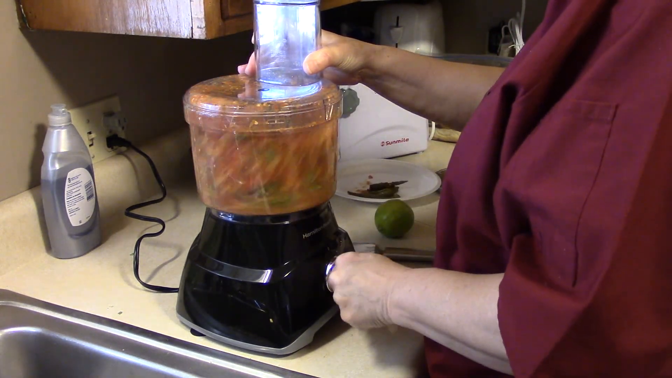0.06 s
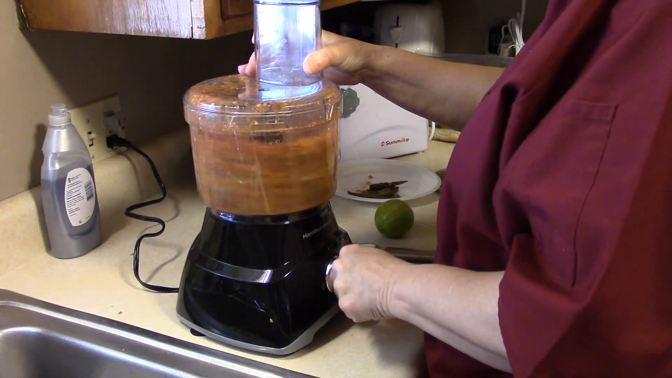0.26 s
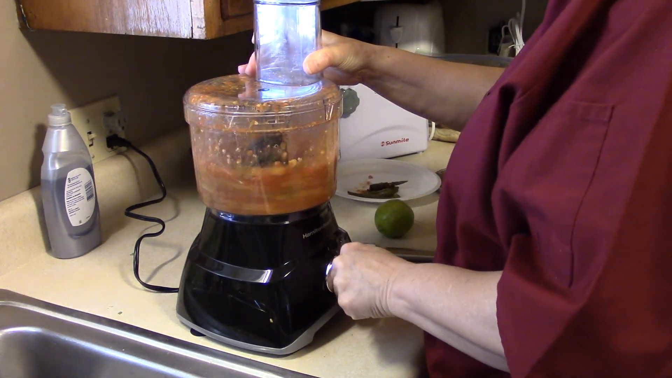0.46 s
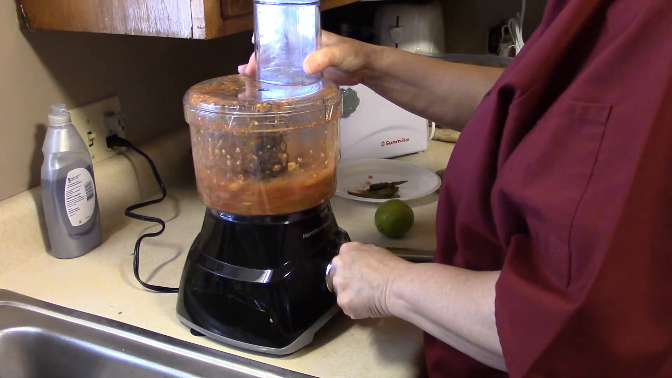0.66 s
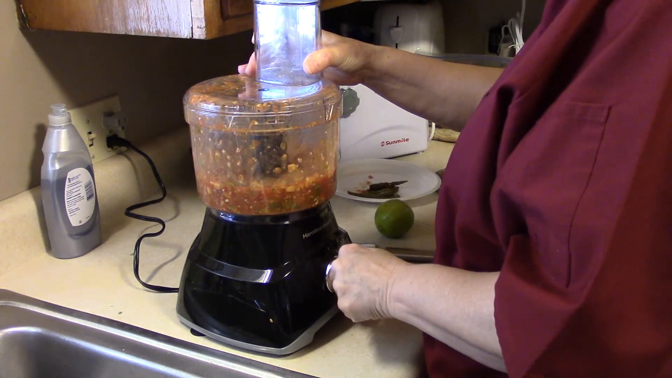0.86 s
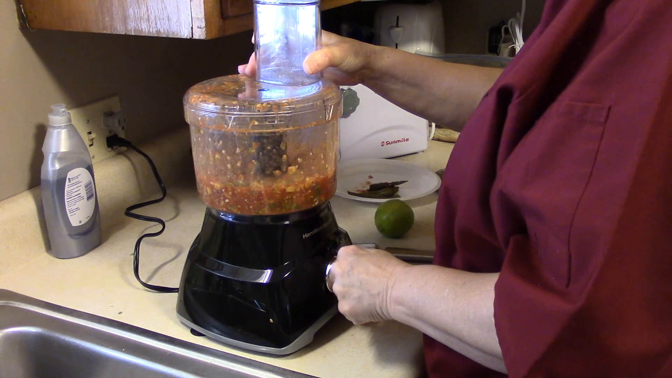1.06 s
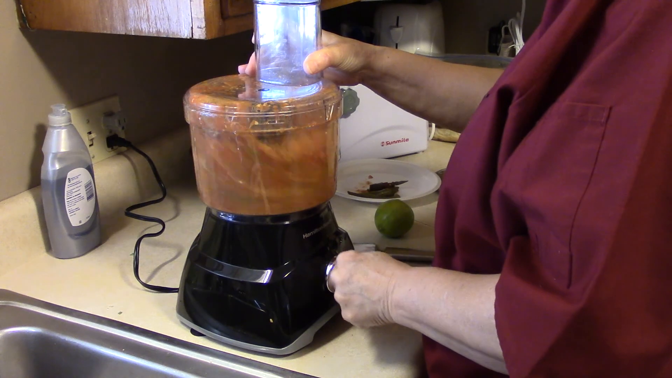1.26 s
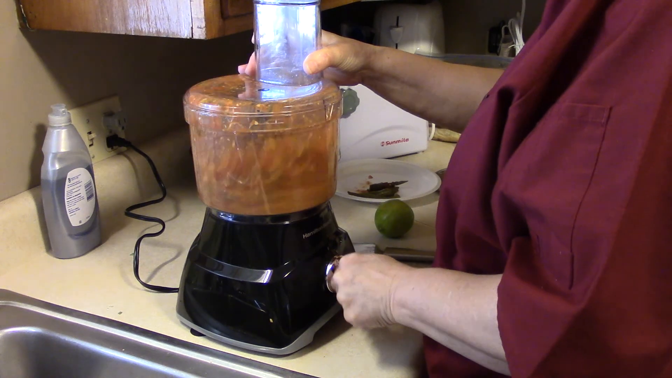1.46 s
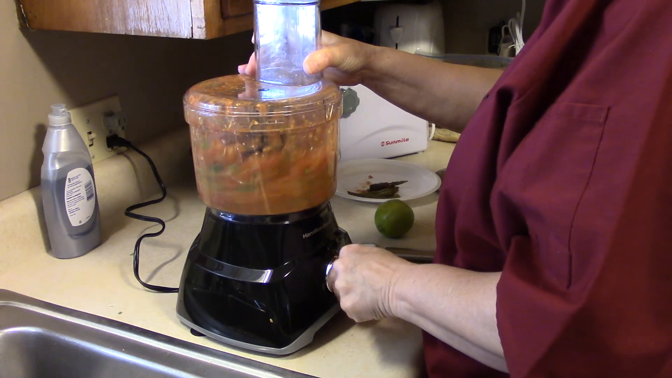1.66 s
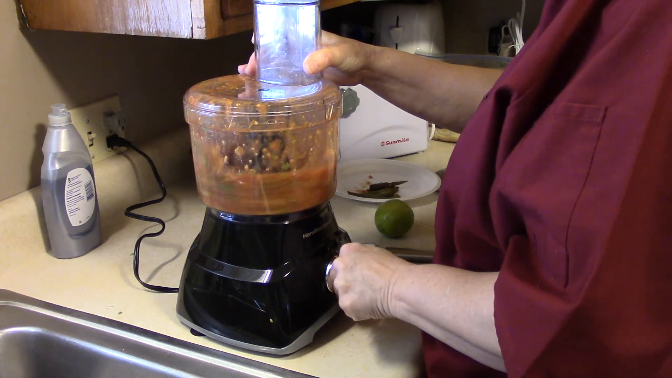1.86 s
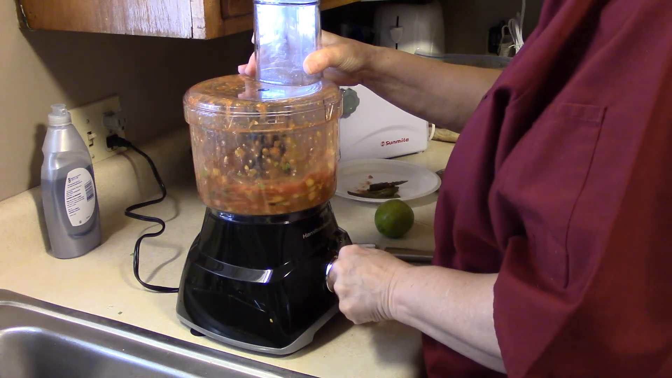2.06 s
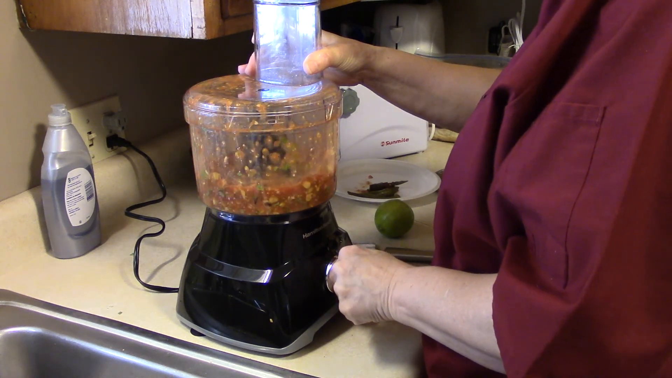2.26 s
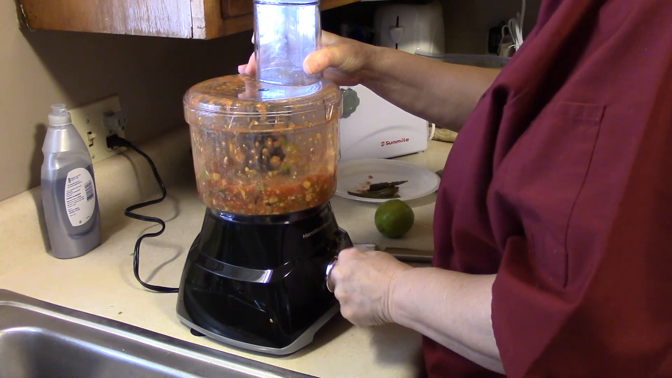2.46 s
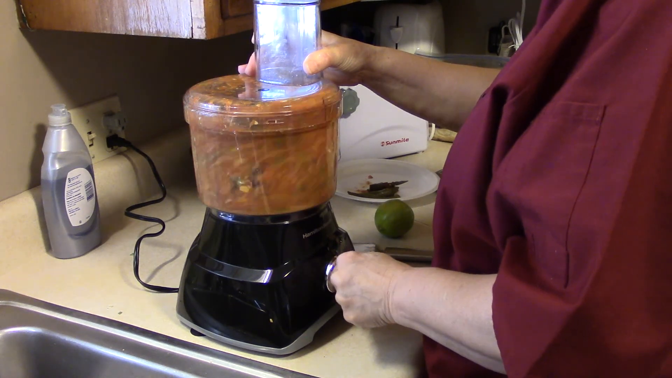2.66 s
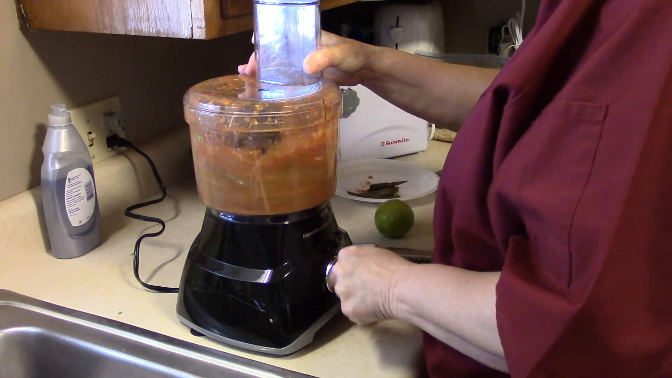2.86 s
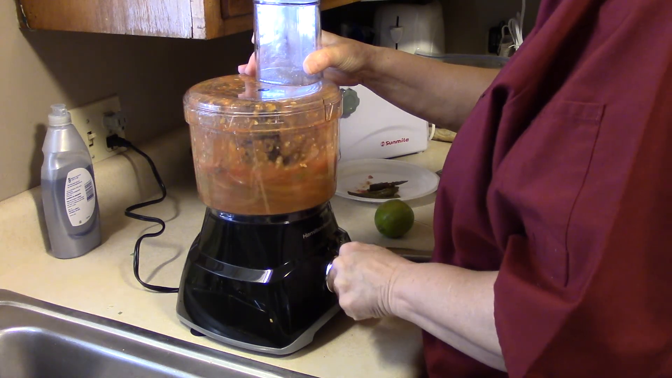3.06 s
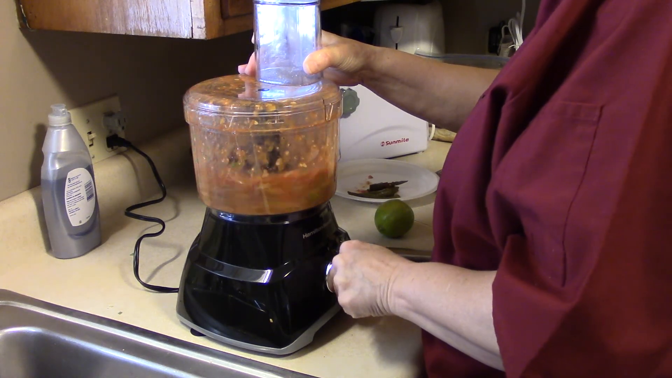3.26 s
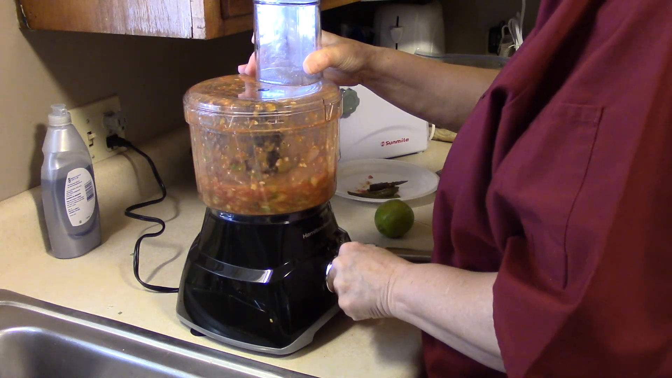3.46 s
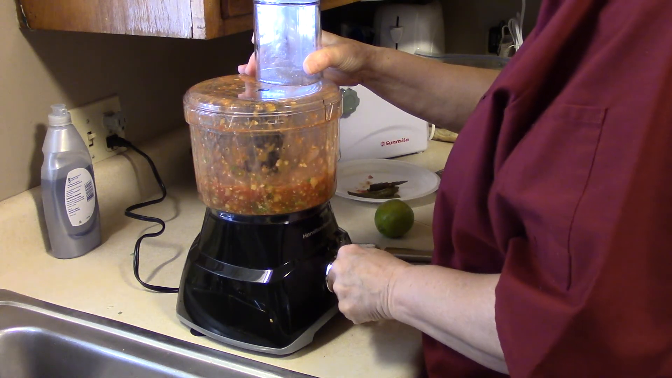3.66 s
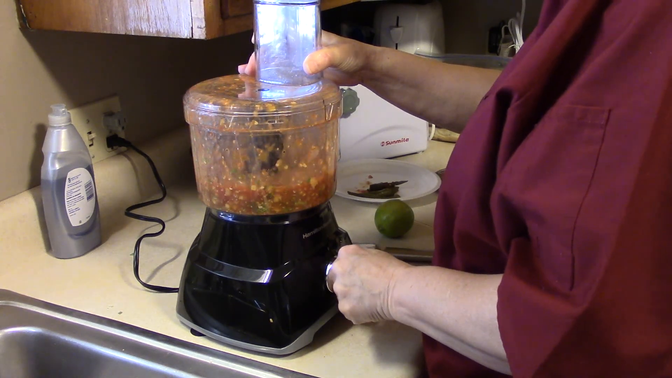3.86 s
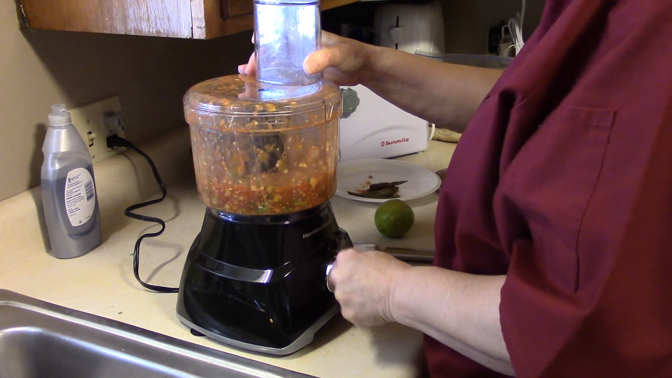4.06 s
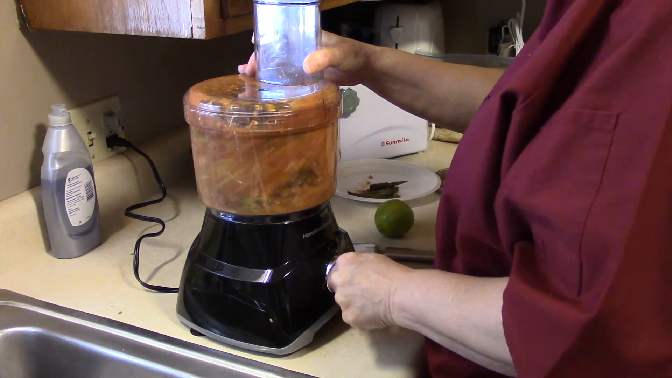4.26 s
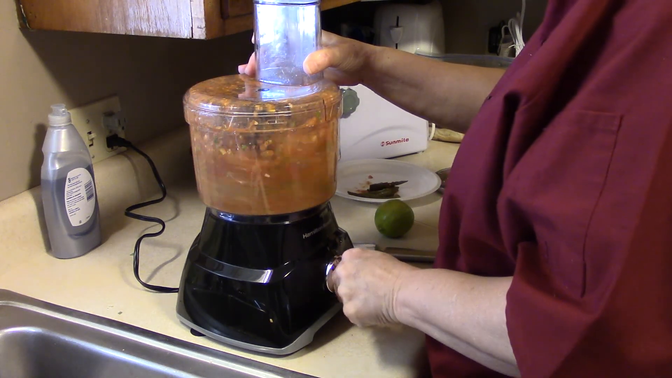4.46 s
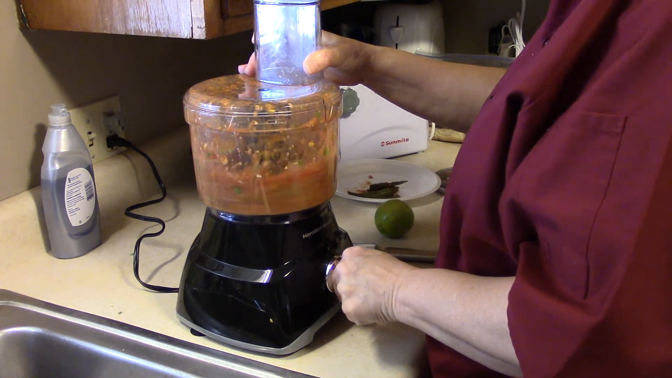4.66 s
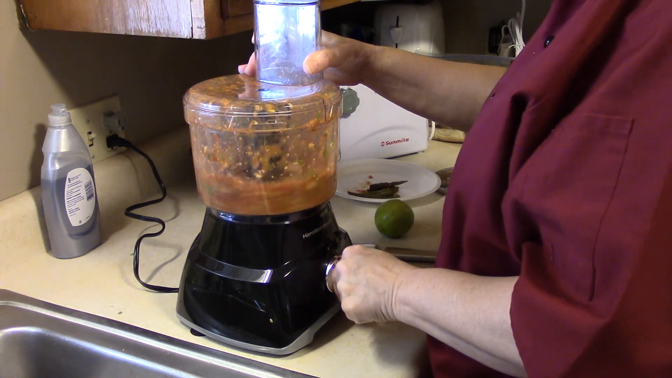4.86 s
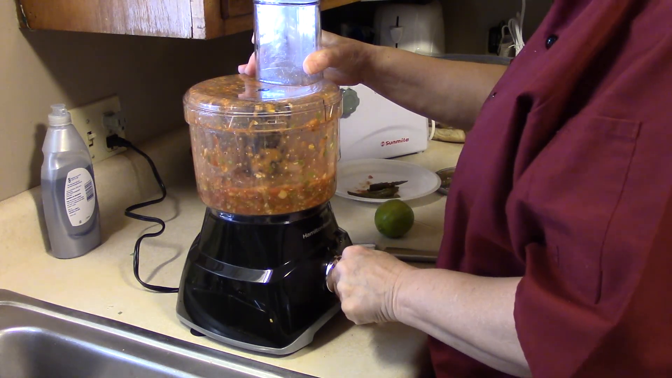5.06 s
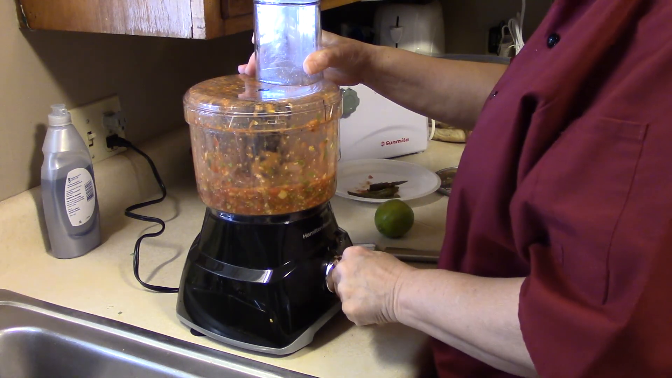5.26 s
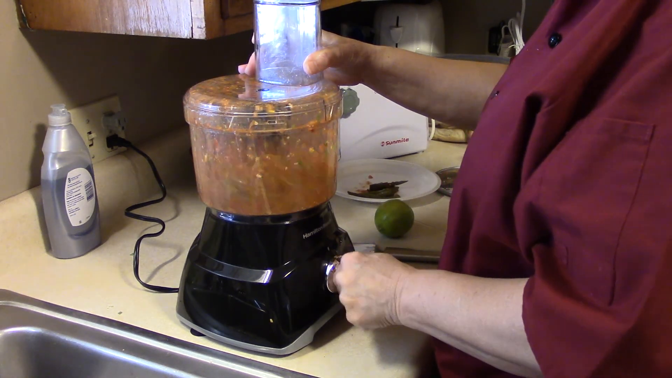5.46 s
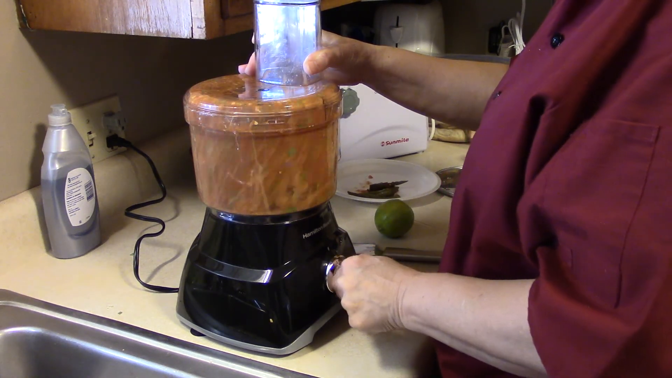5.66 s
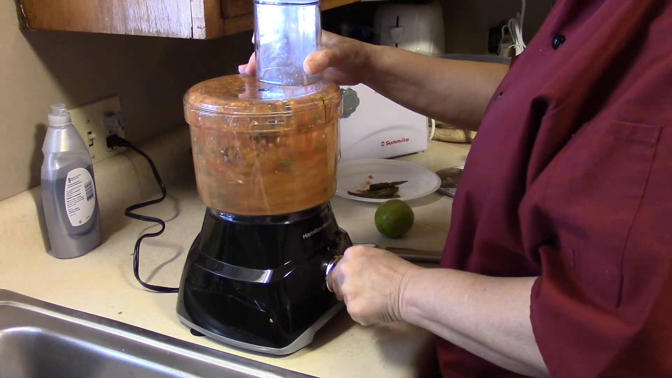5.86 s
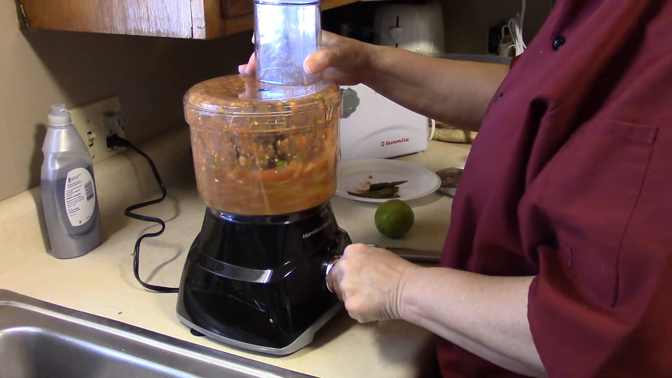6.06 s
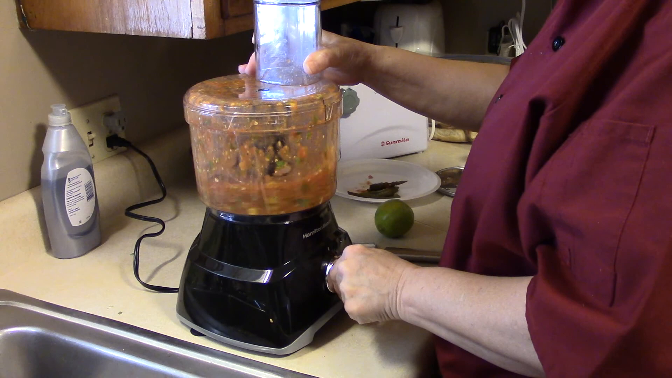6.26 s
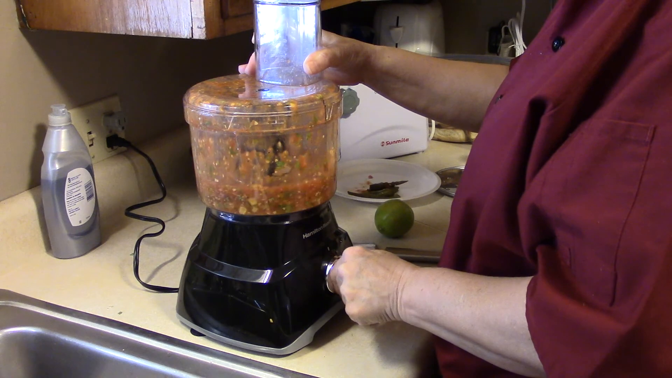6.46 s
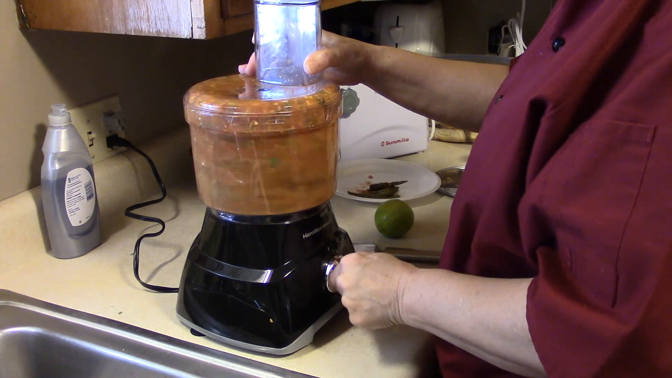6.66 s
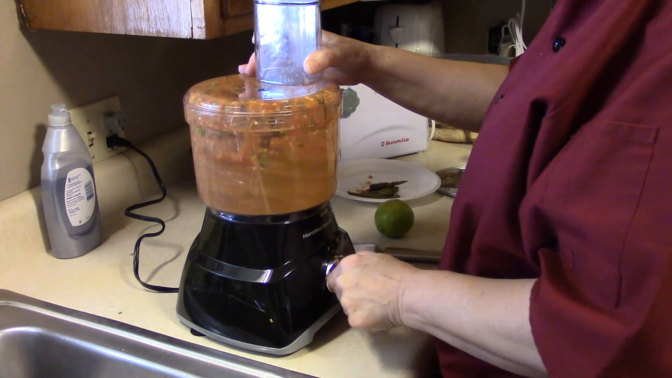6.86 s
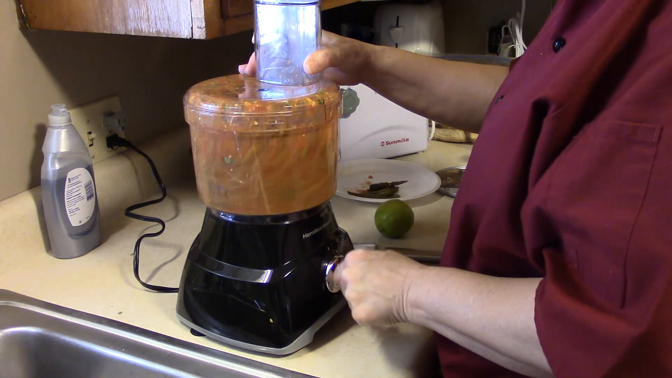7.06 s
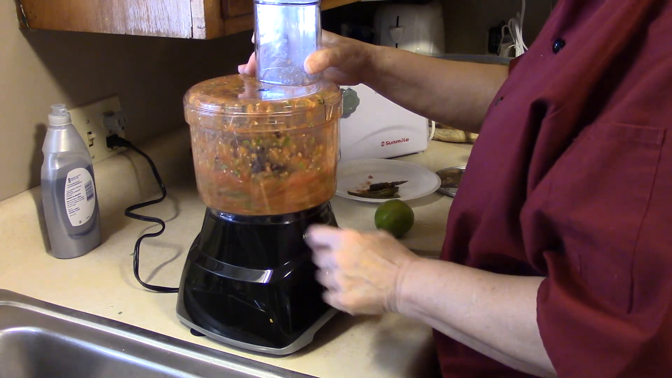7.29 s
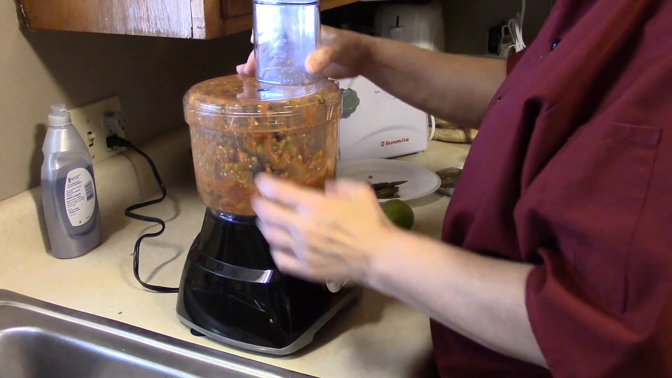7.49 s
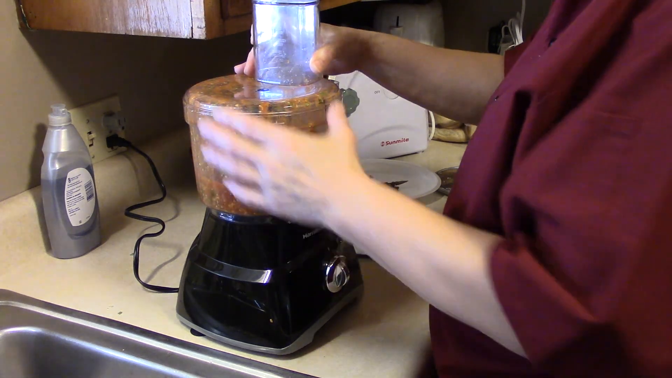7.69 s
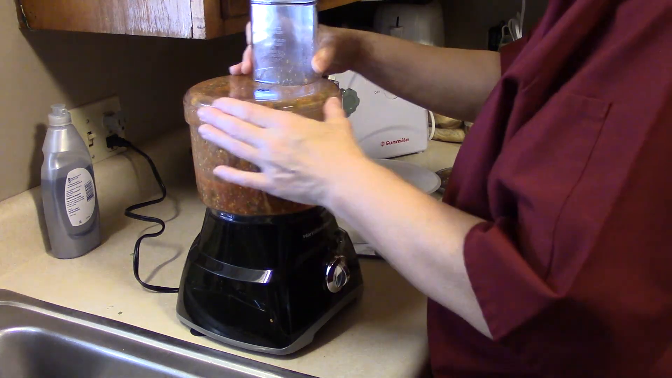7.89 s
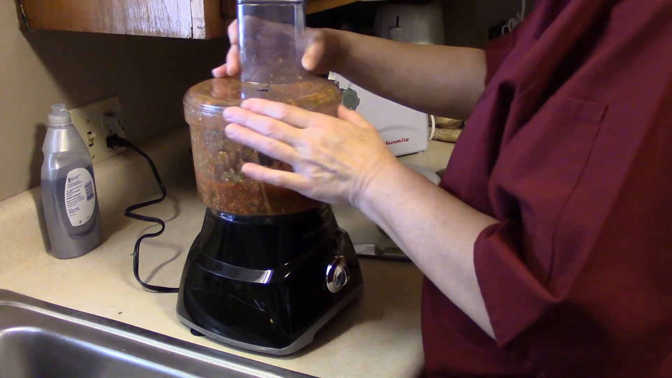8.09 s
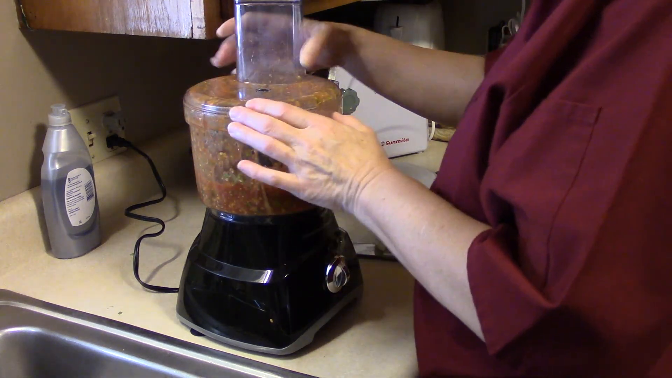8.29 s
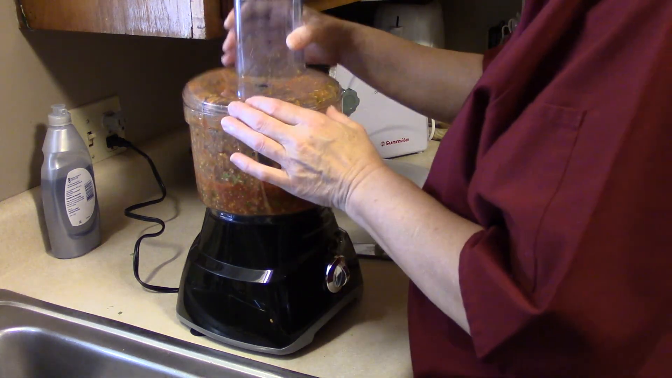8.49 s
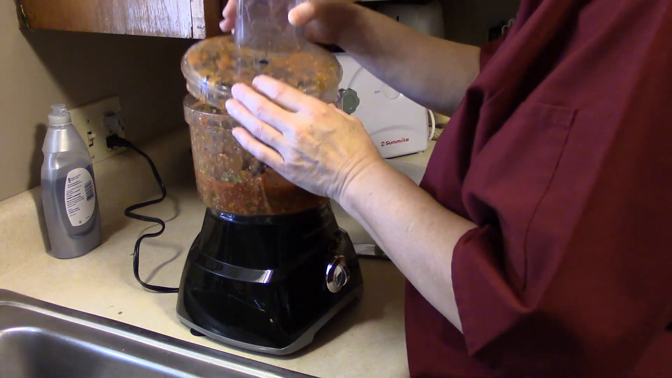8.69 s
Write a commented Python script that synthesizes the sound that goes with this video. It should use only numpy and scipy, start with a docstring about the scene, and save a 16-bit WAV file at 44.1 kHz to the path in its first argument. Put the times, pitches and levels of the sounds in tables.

```python
"""Over a steady appliance hum and a faint intermittent whistle, a food processor of salsa is pulsed six times.
The first pulse is under way at the start: the motor whines, the drive rattles and wet food sprays the bowl.
The blade coasts down and knocks as it stops; each later pulse opens with a switch contact and a jolt of the base.
At the end hands twist the lid loose, and it bumps and slides on the rim. Tones are phase-driven sines;
contacts are noise bursts or random impulses filtered by plastic resonances, and a decaying noise tail is the room."""
import sys
import numpy as np
from scipy import signal
from scipy.fft import rfft, irfft, next_fast_len
from scipy.io import wavfile
from scipy.ndimage import uniform_filter1d, map_coordinates

SR = 44100
rng = np.random.default_rng(int(sys.argv[2]) if len(sys.argv) > 2 else 0)


def dump_mix(stems):
    """Bounce the given channels to the path in sys.argv[1] as a 16-bit WAV at rate SR."""
    frames = np.atleast_2d(stems).T  # one column per channel
    limited = np.clip(frames, -1, 1)  # hard clip at full scale
    pcm = np.round(limited * 32767).astype(np.int16)
    wavfile.write(sys.argv[1], SR, pcm)


N = 384993
T = np.arange(N) / SR  # time, s

# Columns give times, pitches and relative levels; layer gains are applied on top.
# Kitchen noise spectrum: pitch_hz, density_db (per Hz)
QUIET_COLOUR = [(25, -38.5), (42, -40), (58, -21.5), (100, -15), (160, -12.5), (235, -8), (330, -9),
                (480, -11), (700, -16), (1000, -19.5), (1500, -24.5), (2500, -34), (5700, -40.5),
                (11000, -49), (15500, -58)]
# Partials of the appliance hum: pitch_hz, level_db
HUM_PARTIALS = [(119.8, -57), (193.8, -53), (233, -50), (360.7, -55), (387.6, -47), (409.1, -55.5),
                (581.4, -57.5), (1712, -66), (6896, -72), (7020, -77.5)]
# Intervals in which the faint whistle sounds: start_s, end_s
WHISTLE_SPANS = [(.68, .8), (.97, 1.12), (2.05, 2.12), (2.2, 2.33), (3.56, 3.92), (7.77, 7.85)]
# Motor pulses: drive_bites_s, switch_off_s, blade_at_rest_s, level_db, jolt_db, wetness_db
PULSES = [(-.146, .06, .71, -0.2, -2, -1), (1.183, 1.378, 2.033, -1.44, -2, -0.1),
          (2.481, 2.725, 3.44, -1.77, -1.5, 0), (4.073, 4.281, 4.968, -2.2, -1.5, 0.5),
          (5.433, 5.648, 6.36, -1.24, -1.1, 0.04), (6.515, 6.795, 7.57, -2.5, -1.5, 0.9)]
# Resonances of base and bowl: centre_hz, width_hz, lift_db
HOUSING_MODES = [(217.6, 53, -0.5), (314, 36, 5.5), (487, 60, 1.5), (598, 56, 7), (760, 45, 0.5),
                 (916, 92, 2.5), (1089, 78, 2), (1230, 100, 2), (1591, 80, 7), (1753, 91, 2),
                 (2220, 130, 3.5), (2540, 60, -7.5), (2490, 180, 7), (2970, 100, 4), (3530, 51, 1),
                 (6050, 920, 4), (6950, 110, 5.5), (7790, 200, 2.5)]
# Strength of the motor's whine against its pitch: pitch_hz, level_db
WHINE_RESPONSE = [(200, -23), (800, -5), (1600, .5), (2300, 1), (2900, -3), (3600, 0), (4300, -3)]
# Spectrum of the churning load: pitch_hz, density_db (per Hz)
RUMBLE_COLOUR = [(25, -51.5), (70, -23.5), (150, -13), (220, -1), (450, 5), (850, -0.5), (1200, -7),
                 (1800, -10), (3000, -23), (8000, -51)]
# Spectrum of the rattling drive: pitch_hz, density_db (per Hz)
RATTLE_COLOUR = [(40, -55.5), (300, -39.5), (800, -7), (1200, 5.5), (1600, 6), (2600, 4.5), (3300, -6),
                 (4300, -17), (8000, -26), (16000, -55)]
# Spectrum of wet bits hitting the bowl wall: pitch_hz, density_db (per Hz)
SPRAY_COLOUR = [(40, -53.5), (300, -34), (1500, -17.5), (3200, 4), (4600, -2), (7000, -3), (10000, -6.5),
                (13000, -17.5), (16000, -25)]
# Spectrum of the stirred mash's crackle: pitch_hz, density_db (per Hz)
STIR_COLOUR = [(300, -32.5), (1500, -6.5), (3000, 6), (4600, -1.5), (7000, -2), (10000, -7), (13500, -11.5),
               (16000, -16)]
# Spectrum of struck plastic: pitch_hz, density_db (per Hz)
PLASTIC_COLOUR = [(60, -20), (250, 5), (450, 6), (700, 8.5), (1100, 2.5), (2100, -4), (3500, -10.5),
                  (9000, -41.5)]
# Knocks as the blade stops: time_s, level_db
STOP_KNOCKS = [(.662, -22), (2.000, -21), (3.360, -25), (4.915, -26.5), (6.296, -18), (7.555, -22.5)]
# Spectrum of those knocks: pitch_hz, density_db (per Hz)
KNOCK_COLOUR = [(60, -30), (250, 2), (450, 9), (900, 5.5), (1250, -15.5), (2000, -21.5), (3500, -36),
                (9000, -54), (16000, -70.5)]
# Bright part of every contact: pitch_hz, density_db (per Hz)
SNAP_COLOUR = [(40, -53.5), (500, -26), (1500, 7.5), (3000, 5), (5000, 1), (10000, -6), (13000, -17),
               (16000, -24.5)]
# Knob clicks under the fingers: time_s, level_db, bright_share_db
KNOB_CLICKS = [(1.125, -40.5, -2.5), (1.157, -27.5, -18), (2.444, -28.5, -8.5), (4.027, -31, -4.5),
               (4.050, -38, -5.5), (5.326, -28, -12), (6.455, -28, -13), (6.491, -24, -20),
               (7.501, -17.5, -12.5), (7.556, -18, -22)]
# Spectrum of knob and switch contact: pitch_hz, density_db (per Hz)
SWITCH_COLOUR = [(60, -26), (250, -0.5), (600, -1.5), (1200, -0.5), (2500, -4.5), (4000, -13), (9000, -39)]
# Resonances of the lid: centre_hz, width_hz, lift_db
LID_MODES = [(430, 50, 5.5), (610, 50, 8.5), (650, 72, 5.5), (890, 70, 8), (1010, 70, 5.5),
             (1310, 120, 5.5), (1690, 110, 4), (1932, 110, 8), (2265, 67, 0.5), (2710, 90, 3),
             (3380, 80, -0.5), (5230, 200, 2)]
# Spectrum of the starting jolts: pitch_hz, density_db (per Hz)
THUD_COLOUR = [(25, -62), (80, -21.5), (170, 1.5), (400, -1), (620, 6), (1000, -13.5), (2700, -1),
               (4200, -11.5), (9000, -40)]
# Bumps of the lid on the bowl: time_s, level_db, bright_share_db
LID_TAPS = [(7.931, -15, -13), (7.941, -11.5, -2.5), (7.984, -17, -11), (8.195, -9, -24.5),
            (8.303, -25, -33), (8.355, -23, -40), (8.462, -18, -32), (8.476, -21, -21), (8.510, -31, -26),
            (8.544, -30, -7), (8.568, -31.5, 2.5), (8.603, -22.5, -28)]
# Strokes of the lid along the rim: start_s, length_s, rub_db, scrape_db
LID_SLIDES = [(8.175, 0.28, -51, -75), (8.408, 0.17, -38.5, -51)]
# Reverberation of the kitchen: pitch_hz, t60_s
KITCHEN_DECAY = [(150, 0.34), (1000, 0.62), (4000, 0.44), (14000, 0.51)]
# Base response to rotor imbalance: rotor_hz, level_db
MOUNT_RESPONSE = [(40, -64.0), (100, -31.5), (150, -20), (225, -6), (270, -7), (310, 1), (345, 3.5), (385, -11)]
# Nearly flat spectrum exciting the housing with the whine: pitch_hz, density_db (per Hz)
WHINE_COLOUR = [(100, 0.0082), (16000, 0)]
# Spectrum of the lid's scrape: pitch_hz, density_db (per Hz)
SCRAPE_COLOUR = [(2000, -18.0), (5000, 5.0), (10500, -4.5), (16000, -14.0)]
# Spectrum of the left-right difference: pitch_hz, density_db (per Hz)
SIDE_COLOUR = [(250, 0.5), (1000, -1.5), (4000, 3), (8000, 4.0), (14000, -7.5)]

FREE_HZ, SPIN_UP_S = 402, 0.099  # free rotor speed in turns a second, and its time constant
LEAD_S = 0.012  # the power comes on this long before the drive bites


def amp(db):
    """Level law: converts decibels to an amplitude ratio."""
    return 10 ** (np.asarray(db) / 20)


def unit(x):
    """Power normalisation: scales to rms 1."""
    return x / np.sqrt(np.mean(x ** 2) + 1e-20)


def along(points, hz):
    """Logarithmic frequency scale: interpolates (Hz, value) points."""
    f, v = np.transpose(points)
    return np.interp(np.log(hz + 1), np.log(f + 1), v)


def wobble(rate):
    """Band-limited fluctuation: a smooth curve through random knots, rate a second."""
    knots = rng.standard_normal(int(N * rate / SR) + 4)
    return map_coordinates(knots, [T * rate])


def body(colour, modes=(), size=8192):
    """Minimum-phase resonator: a causal response of energy 1 with a broad colour and modal lifts."""
    hz = np.fft.rfftfreq(size, 1 / SR)
    db = along(colour, hz)
    for centre, width, lift in modes:
        db = db + lift / (1 + (2 * (hz - centre) / width) ** 2)
    cepstrum = irfft(np.log(amp(db)))
    # folding the cepstrum onto positive time makes the response causal
    cepstrum[1:size // 2] *= 2
    cepstrum[size // 2 + 1:] = 0
    response = irfft(np.exp(rfft(cepstrum)))
    return response / np.linalg.norm(response)


def through(x, response):
    """Linear superposition: each sample of x rings the impulse response."""
    return signal.oaconvolve(x, response)[:N]


def impacts(rate, spread_db):
    """Random collision train: signed impulses of uneven size, rate a second, scaled to rms 1."""
    chance = rate / SR
    hit = rng.random(N) < chance
    sign = np.sign(rng.standard_normal(N))
    size = amp(spread_db * rng.standard_normal(N))
    return unit(hit * sign * size / np.sqrt(chance))  # keeps the power even as the rate changes


def blows(rows, colour, modes, t60, snap_t60, body_db, snap_db, attack):
    """Contact transient: decaying noise excites the plastic, with a separate bright snap on top."""
    dull, bright = np.zeros((2, N + SR))
    t = np.arange(SR // 3) / SR
    onset = 1 - np.exp(-t / attack)
    for s, db, share_db in rows:
        a, b = rng.standard_normal((2, len(t))) * onset
        span = slice(round(s * SR), round(s * SR) + len(t))
        dull[span] += a * amp(db + body_db - 60 * t / t60)
        bright[span] += b * amp(db + share_db + snap_db - 60 * t / snap_t60)
    return through(dull[:N], body(colour, modes)) + through(bright[:N], body(SNAP_COLOUR, modes))


def background(noise_db=-44, hum_db=-1, whistle_db=-67):
    """Stationary noise and weakly modulated partials: air, appliance hum and a gated whistle."""
    air = through(rng.standard_normal(N), body(QUIET_COLOUR))
    hum = np.zeros(N)
    for hz, db in HUM_PARTIALS:
        phase = 2 * np.pi * hz * T + 0.92 * wobble(9)
        hum += amp(db + 1.5 * wobble(2.4)) * np.sin(phase)
    gate = sum(1. * ((T > a) & (T < b)) for a, b in WHISTLE_SPANS)
    gate = uniform_filter1d(gate, size=600)
    whistle = gate * amp(2 * wobble(12)) * np.sin(2 * np.pi * 5561 * T)
    return amp(noise_db) * air + amp(hum_db) * np.sqrt(2) * hum + amp(whistle_db) * whistle


def motor(current_decay_s=0.076, drag=2.75):
    """Rotor dynamics: exponential approach to free speed, then a power-law coast to rest."""
    speed, current, gain, wetness = np.zeros((4, N))
    for bite, off, rest, db, _, wetness_db in PULSES:
        on = bite - LEAD_S
        rise = 1 - np.exp(-np.clip(T - on, 0, off - on) / SPIN_UP_S)
        coast = np.clip((rest - T) / (rest - off), 0, 1) ** drag
        engaged = (T > bite) & (T < rest)  # the drive is silent until its slack is taken up
        speed += FREE_HZ * rise * coast
        current += engaged * np.exp(-np.maximum(T - off, 0) / current_decay_s)
        gain += engaged * amp(db)
        wetness += engaged * amp(wetness_db)
    speed = uniform_filter1d(speed, size=900).clip(0)
    torque = current * (1 - speed / FREE_HZ)
    return speed, current, torque, gain, wetness


def rotor(speed, top_db=-23, second_db=-13, shudder=0.6):
    """Rotating imbalance: the base shakes once per turn, steadier near top speed than below it."""
    turn = 2 * np.pi * np.cumsum(speed) / SR
    mount = along(MOUNT_RESPONSE, speed)
    drift = (shudder + 2 * (1 - speed / speed.max())) * wobble(45) / 2
    shake = np.sin(turn + drift) + amp(second_db) * np.sin(2 * turn)
    return amp(top_db + mount + 1.2 * wobble(25)) * shake


def whine(speed, current, torque, driven_db=-20, coasting_db=-21.5, skirt_db=-1, strain_db=6):
    """Rotational harmonics: ten beats a turn sing, growl under torque and waver when coasting."""
    turn = 2 * np.pi * np.cumsum(speed) / SR
    rough = .35 + 2.4 * torque + .2 * (1 - current)  # phase deviation, radians per unit wobble
    tone = np.sin(10 * turn + rough * wobble(260) + 2 * wobble(35))
    skirt = np.sin(10 * turn) * wobble(900) * (.5 + torque)  # noise sidebands around the tone
    skirt += .35 * np.sin(9 * turn + 2 * wobble(90))
    gain = amp(driven_db) * current + amp(coasting_db) * speed / FREE_HZ
    gain *= amp(strain_db * torque + 2.6 * wobble(60))
    beats = (tone + amp(skirt_db) * skirt) * gain * amp(along(WHINE_RESPONSE, 10 * speed))
    return through(beats, body(WHINE_COLOUR, HOUSING_MODES))


def rumble_gain(speed, top_db=-19.5, growth=.41):
    """Sublinear power law: the churning load grows only slowly with speed."""
    return amp(top_db) * (speed / FREE_HZ) ** growth


def rattle_gain(speed, top_db=-16.5, growth=0.82, seated_hz=190):
    """Saturating growth: the rattle levels off once the drive runs fast enough to seat itself."""
    shake = (speed / seated_hz) ** growth
    return amp(top_db) * shake / np.hypot(1, shake)


def spray_gain(speed, top_db=-10.5, growth=2.33):
    """Steep power law: wet food is flung at the wall mostly near full speed."""
    return amp(top_db) * (speed / FREE_HZ) ** growth


def stir_gain(speed, top_db=-24.5, growth=0.69, stall_hz=11):
    """Drag threshold: the mash crackles until the slowing blade no longer drags it round."""
    return amp(top_db) * (speed / FREE_HZ) ** growth * np.tanh(speed / stall_hz)


def soften(x, speed, soft_hz=2300, hard_speed_hz=90):
    """Contact stiffness: slow contacts are soft, so treble fades as the rotor slows."""
    dull = signal.sosfiltfilt(signal.butter(2, soft_hz, fs=SR, output="sos"), x)
    return dull + np.tanh(speed / hard_speed_hz) * (x - dull)


def chopping(speed, torque, wetness, gear_ratio=6.2, throb=0.085, lurch_db=-0.9):
    """Stochastic collisions: load, drive, spray and mash hit more densely with speed, harder with torque."""
    blade = 2 * np.pi * np.cumsum(speed) / SR / gear_ratio
    passes = 1 + throb * np.cos(2 * blade)  # two knives a turn
    lurch = amp(lurch_db * (1 - speed / FREE_HZ - torque) * wobble(22))  # the coasting load slumps unevenly

    def layer(colour, gain, rate, strain_db, uneven_db):
        """Filtered shot noise: impacts of the given rate a second ring the housing."""
        force = gain * amp(strain_db * torque + uneven_db * wobble(35)) * passes * lurch
        return through(force * impacts(rate, spread_db=1.5), body(colour, HOUSING_MODES))

    rumble = layer(RUMBLE_COLOUR, rumble_gain(speed), 400 + 15 * speed, 14, 1.8)
    rattle = layer(RATTLE_COLOUR, rattle_gain(speed), 500 + 22 * speed, 7, 1.3)
    spray = layer(SPRAY_COLOUR, wetness * spray_gain(speed), 1500 + 30 * speed, 16, .8)
    stir = layer(STIR_COLOUR, wetness * stir_gain(speed), 900 + 25 * speed, 8, 1.2)
    return rumble + soften(rattle, speed) + spray + stir


def chunks(speed, per_turn=0.27, chunk_db=-8):
    """Sparse collisions: larger pieces slap the bowl and ring its plastic."""
    slaps = impacts(15 + per_turn * speed, spread_db=0.5)
    slaps = slaps * amp(chunk_db) * rumble_gain(speed) * speed / FREE_HZ
    return through(slaps, body(PLASTIC_COLOUR, HOUSING_MODES))


def stop_knocks(bright_db=-39):
    """Arrested rotation: the blade knocks on the housing as it comes to rest."""
    stops = [(s, db, bright_db) for s, db in STOP_KNOCKS]
    return blows(stops, KNOCK_COLOUR, HOUSING_MODES, t60=0.043, snap_t60=.045,
                 body_db=-2, snap_db=-7, attack=.0006)


def switch(contact_db=-19, bright_db=-14.5):
    """Snap contact: the knob clicks when handled, and its contact closes just before each jolt."""
    contacts = [(bite - LEAD_S, contact_db, bright_db) for bite, *_ in PULSES if bite > 0]
    return blows([*KNOB_CLICKS, *contacts], SWITCH_COLOUR, LID_MODES, t60=0.021, snap_t60=0.0084,
                 body_db=-1, snap_db=12, attack=.00076)


def starting_jolts(bright_db=-19):
    """Reaction impulse: the drive jolts the base as it takes up its slack."""
    jolts = [(bite, db, bright_db) for bite, _, _, _, db, _ in PULSES if bite > 0]
    return blows(jolts, THUD_COLOUR, HOUSING_MODES, t60=0.16, snap_t60=0.041,
                 body_db=-5.5, snap_db=8.5, attack=0.0018)


def lid_bumps(rebound_s=0.016, rebound_db=-7.5):
    """Inelastic rebound: each bump of the loose lid on the rim is followed by one weaker bump."""
    rebounds = [(s + rebound_s, db + rebound_db, bright_db) for s, db, bright_db in LID_TAPS]
    return blows([*LID_TAPS, *rebounds], PLASTIC_COLOUR, LID_MODES, t60=0.059, snap_t60=0.039,
                 body_db=-8.5, snap_db=1.5, attack=0.0012)


def slide(slips=900, catch_db=7.0, catches=55, scrape_lag=3.3):
    """Stick-slip friction: many tiny slips a second catch unevenly, the scrape peaking late in a stroke."""
    rub, scrape = np.zeros((2, N))
    for start, length, rub_db, scrape_db in LID_SLIDES:
        progress = np.clip((T - start) / length, 0, 1)
        rub += amp(rub_db) * np.sin(np.pi * progress)
        scrape += amp(scrape_db) * np.sin(np.pi * progress ** scrape_lag) ** 2
    grip = amp(catch_db * wobble(catches))
    rub = rub * grip * impacts(slips, spread_db=1.5)
    scrape = scrape * grip * impacts(slips, spread_db=1.5)
    return through(rub, body(PLASTIC_COLOUR, LID_MODES)) + through(scrape, body(SCRAPE_COLOUR))


def room(x):
    """Diffuse reverberation: a noise tail in which each frequency decays at its own rate."""
    hz, t, z = signal.stft(rng.standard_normal(SR // 2), SR, nperseg=256)
    decay = amp(-60 * t / along(KITCHEN_DECAY, hz)[:, None])
    tail = signal.istft(z * decay, SR, nperseg=256)[1]
    return through(x, np.pad(tail / np.linalg.norm(tail), (130, 0)))  # delay in samples


def scene(wet_db=-5, side_db=-25.5, chop_db=-1.5):
    """Mid-side superposition: a central machine, a faint reverberant difference and a slight left bias."""
    speed, current, torque, gain, wetness = motor()
    food = amp(chop_db) * chopping(speed, torque, wetness) + chunks(speed)
    machine = gain * (food + whine(speed, current, torque)) + rotor(speed)
    machine += stop_knocks() + switch() + starting_jolts() + lid_bumps() + slide()
    mid = machine + amp(wet_db) * room(machine) + background()
    side = amp(side_db) * through(room(mid), body(SIDE_COLOUR))
    return np.array([mid + side, mid - side]) * amp([[.19], [-.19]])  # channel trim, dB


def record(dry, knee=5, top_hz=15750):
    """Soft saturation and band limiting: rounds the highest peaks and removes what lies above top_hz."""
    soft = dry / (1 + np.abs(dry) ** knee) ** (1 / knee)
    m = next_fast_len(N + 8192)
    band = np.clip((top_hz - np.fft.rfftfreq(m, 1 / SR)) / 400 + .5, 0, 1)  # 400 Hz wide edge
    return irfft(rfft(soft, m) * band, m)[:, :N]


dry = scene()
out = record(dry)
dump_mix(out)
```